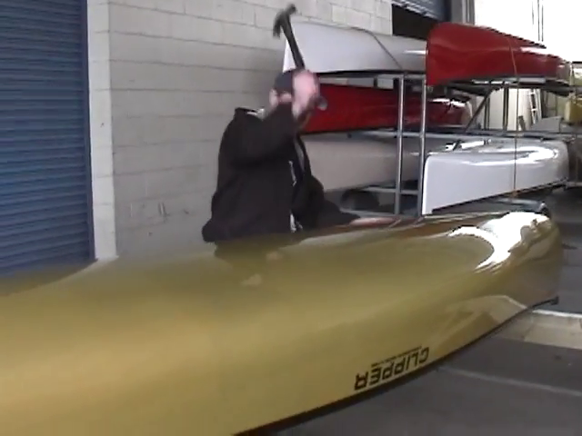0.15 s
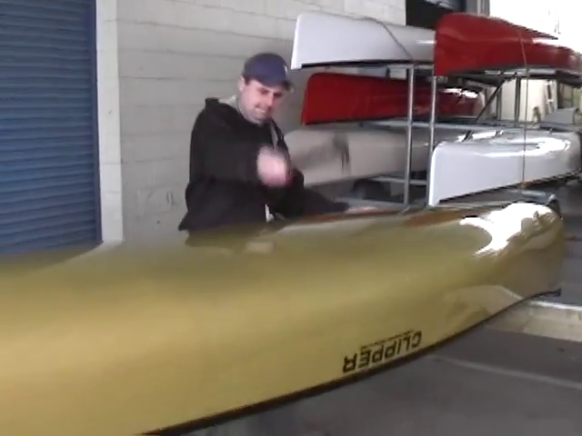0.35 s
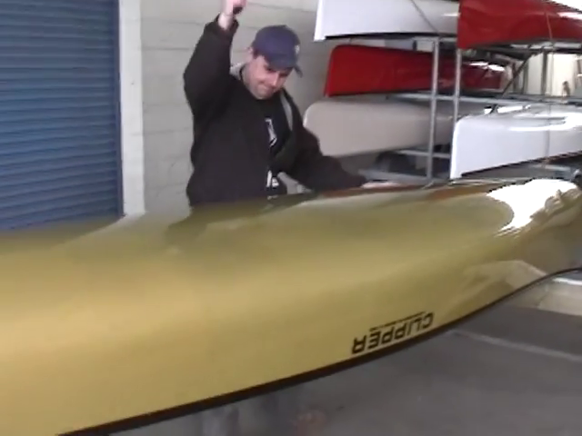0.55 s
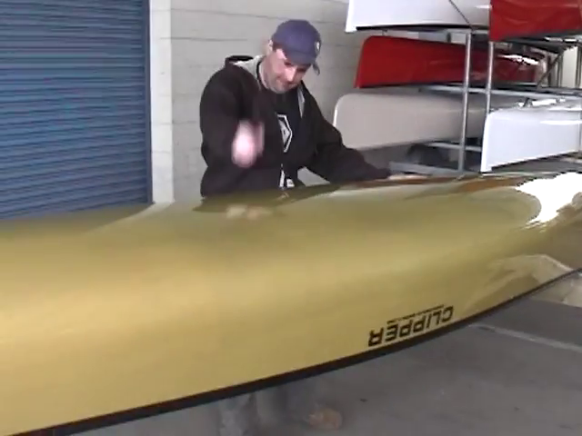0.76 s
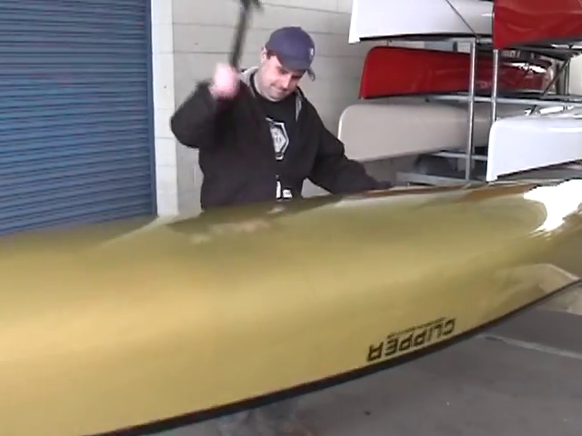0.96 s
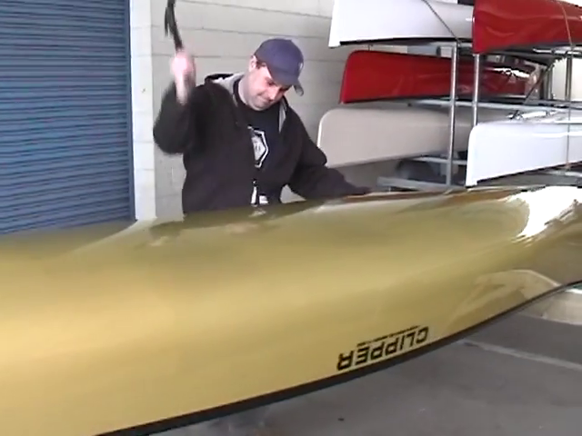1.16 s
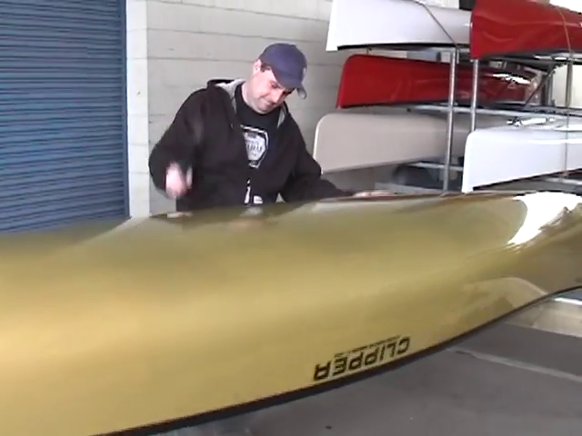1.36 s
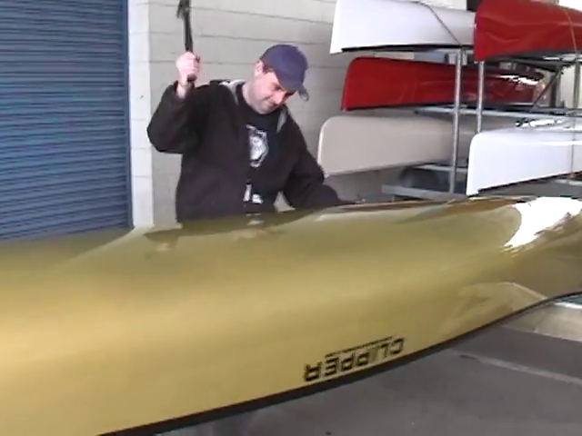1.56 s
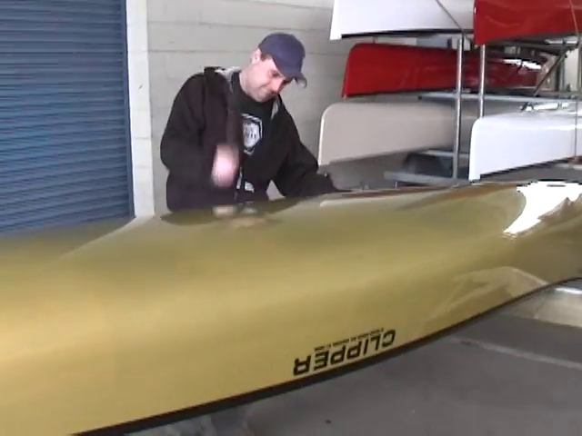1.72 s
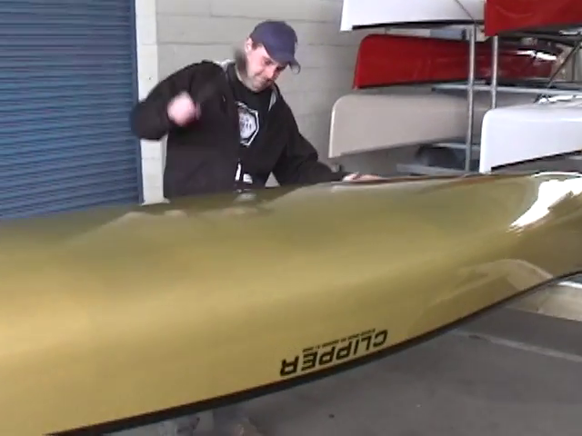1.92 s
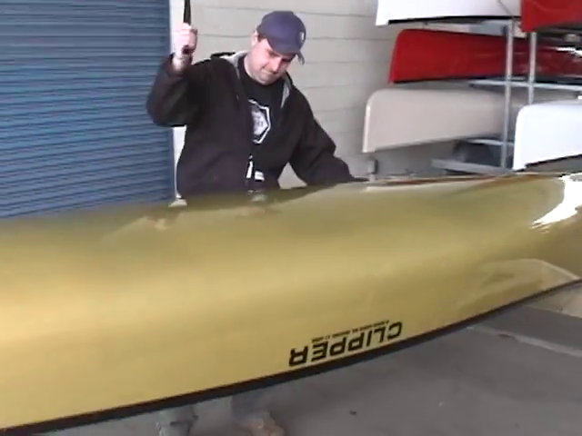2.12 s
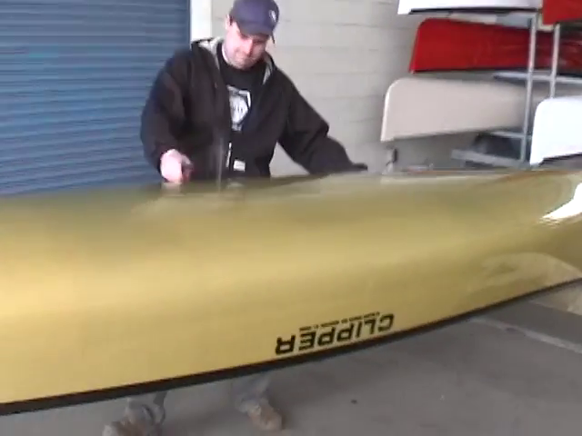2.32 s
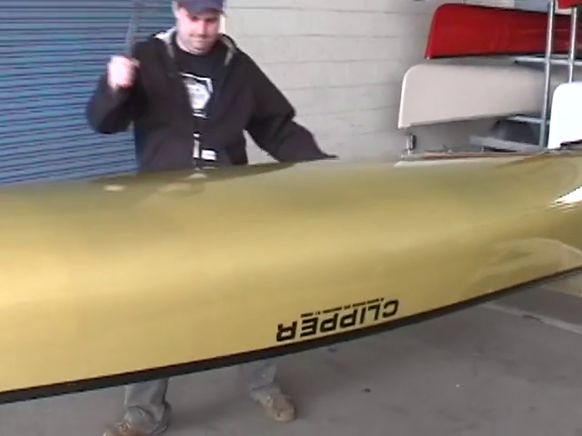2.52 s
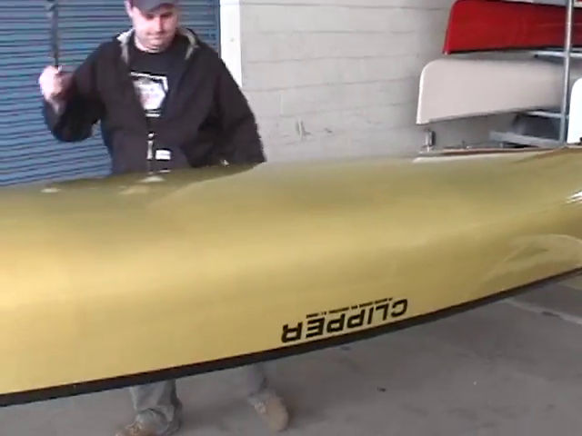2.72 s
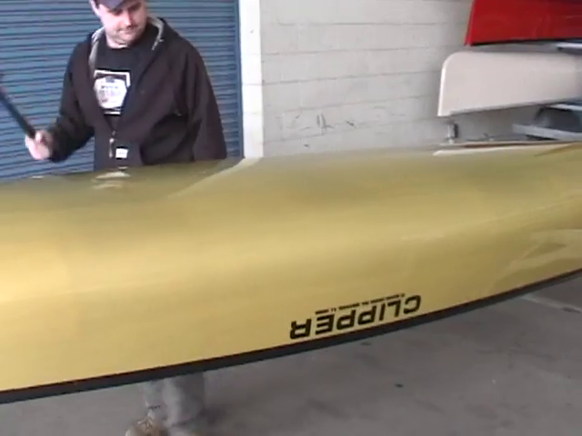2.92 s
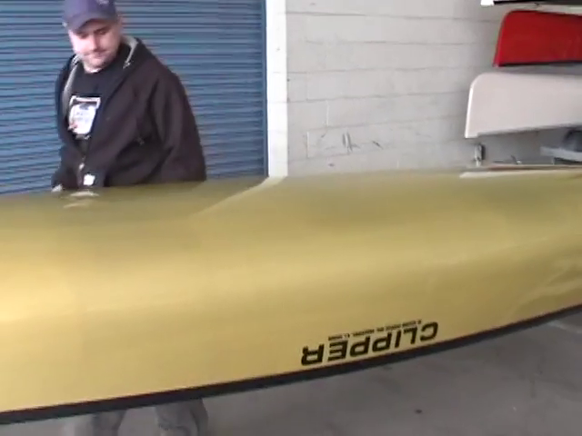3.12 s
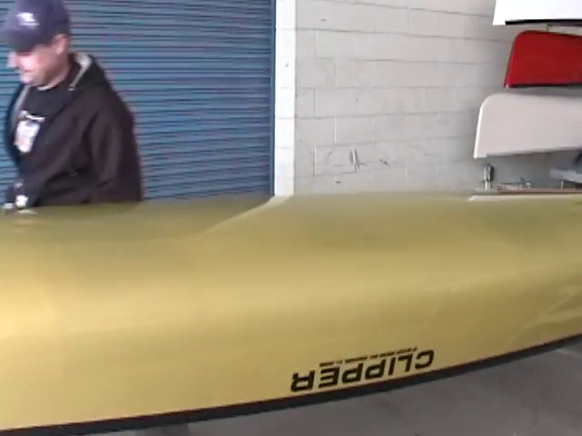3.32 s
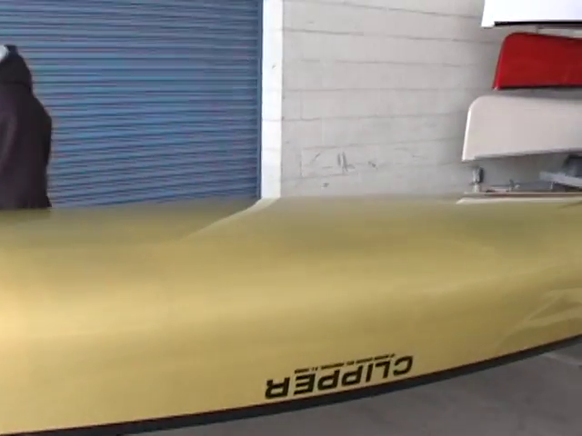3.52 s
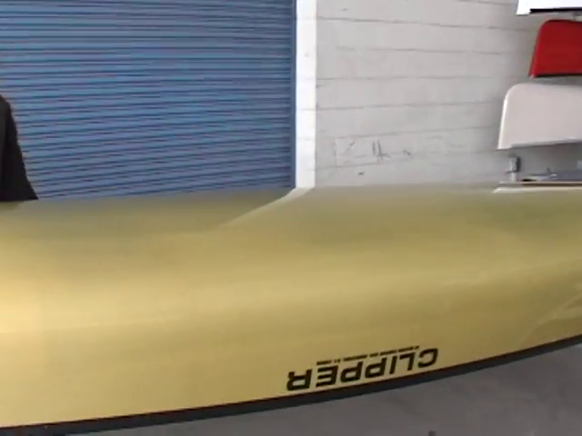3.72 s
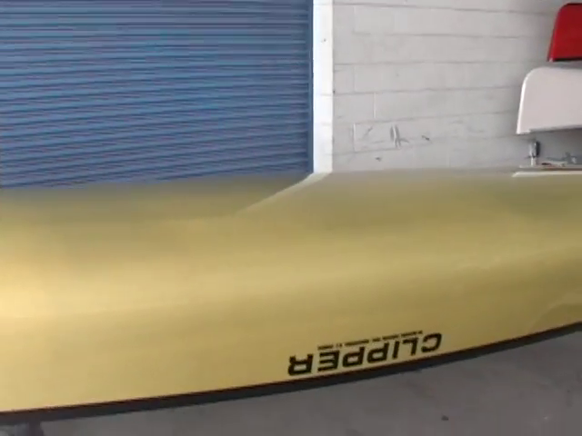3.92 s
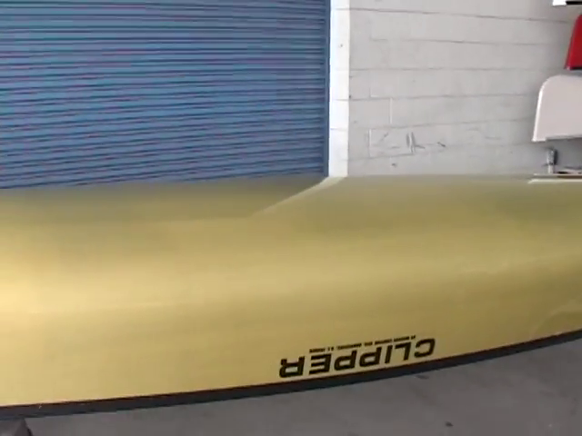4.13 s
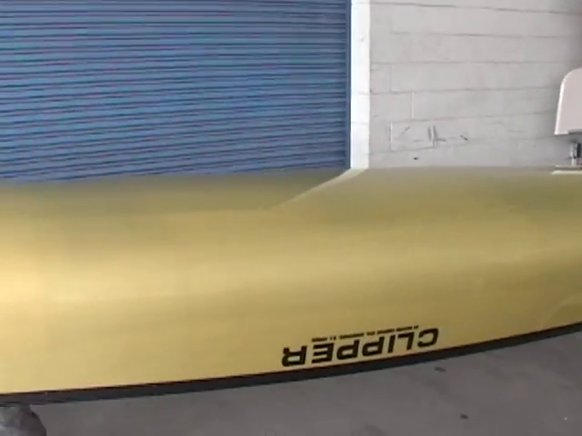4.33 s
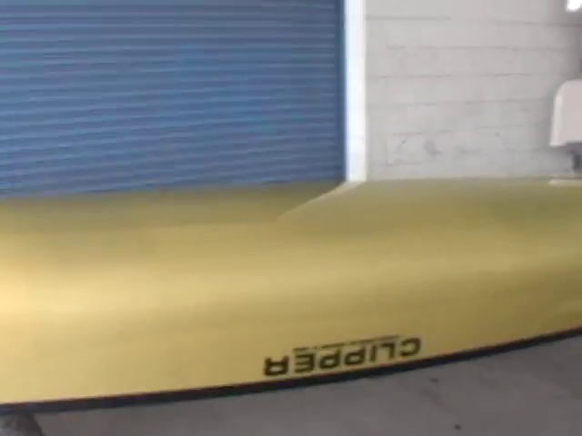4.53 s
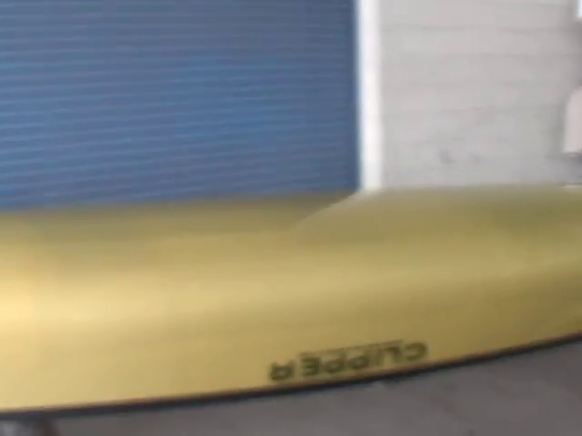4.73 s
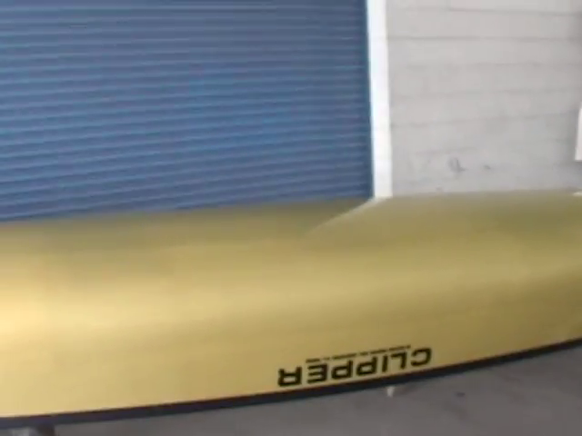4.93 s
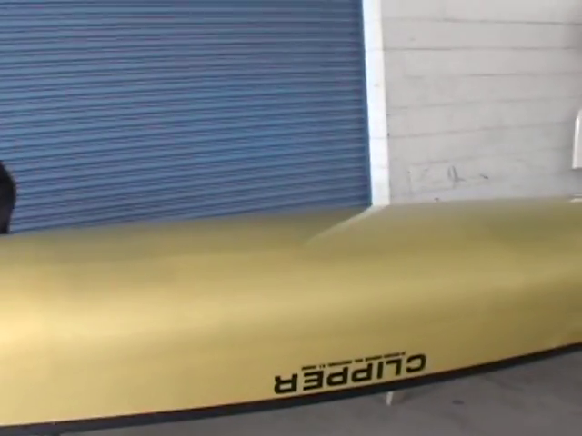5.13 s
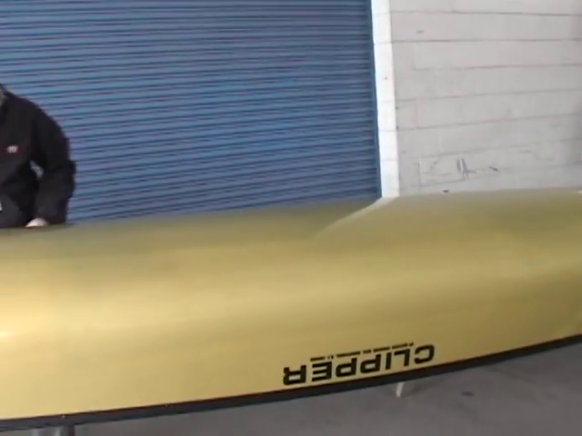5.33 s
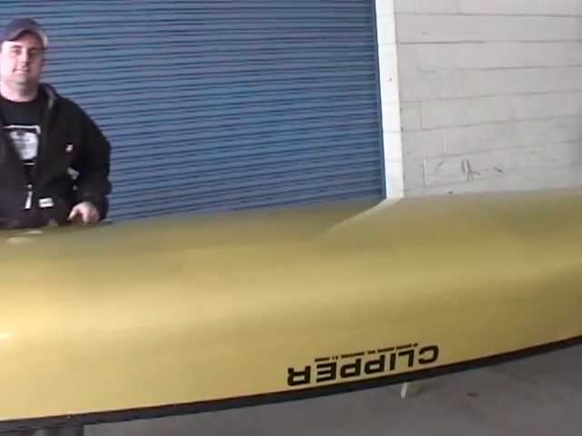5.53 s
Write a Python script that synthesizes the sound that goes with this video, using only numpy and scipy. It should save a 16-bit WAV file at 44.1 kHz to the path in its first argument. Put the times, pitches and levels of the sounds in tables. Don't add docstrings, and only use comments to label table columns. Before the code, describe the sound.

The stretch opens on the loud ringing tail of a hammer blow just struck. Five more blows follow at about 0.33, 0.84, 1.32, 1.81 and 2.35 s, steady and forceful: a hard steel crack with an instant slap off concrete, a hollow knock, then a dense low-mid boom from the hull and yard, overlapping into the next hit. The microphone clips on each, crunchy and compressed. Bright, grainy rattles of straps and racks shiver between blows. From 2.4 to about 4 s the boom decays, with faint late rattles. From about 3.6 s the recording gain creeps up, lifting a dull roar of traffic and machinery and an unsteady idling engine. Barely audible ticks come near 3.8 and 3.95 s; from 4.66 to 4.87 s there are dry clicks, a clearer clunk at 4.77 s and a brief scrape. A low, buzzy motor drone swells from about 4.7 s, strongest at 5.1 to 5.4 s, then eases slightly.

```python
import sys
import numpy as np
from scipy import signal
from scipy.fft import rfft, irfft, next_fast_len
from scipy.io import wavfile
from scipy.ndimage import uniform_filter1d

SR = 44100
rng = np.random.default_rng(int(sys.argv[2]) if len(sys.argv) > 2 else 0)


def to_linear_factor(level_db):
    exponent = np.asarray(level_db, float) / 20
    return 10 ** exponent


def to_wav(sig):
    pcm = np.clip(np.atleast_2d(sig), -1, 1) * 32767
    pcm = np.round(pcm).astype(np.int16)
    wavfile.write(sys.argv[1], SR, pcm.T)


N = 249593
T = np.arange(N) / SR


def on_log(table, hz):
    f, v = np.transpose(table)
    return np.interp(np.log(hz), np.log(np.maximum(f, 1)), v)


def walk(rate_hz):
    k = int(SR / rate_hz)
    held = np.repeat(rng.standard_normal(N // k + 1), k)
    return 1.296 * uniform_filter1d(uniform_filter1d(held, k), k)[:N]


def phase(hz):
    return 2 * np.pi * np.cumsum(hz) / SR


def fade(start_s, t60_s, rise_s):
    out = np.zeros(N)
    span = slice(max(int(start_s * SR) + 1, 0), int((start_s + 1.4 * t60_s) * SR))
    t = T[span] - start_s
    out[span] = (1 - np.exp(-t / rise_s)) * np.exp(-np.log(1000) * t / t60_s)
    return out


def bands(side, modal_db, modal_hz=22):
    n = next_fast_len(N)
    f = np.maximum(np.arange(n // 2 + 1) * SR / n, 1)
    mid, diff = rfft(rng.standard_normal((2, n)))
    k = int(modal_hz * n / SR)
    peaks = uniform_filter1d(rng.standard_normal(len(f)), k) * np.sqrt(k)
    ripple = to_linear_factor(modal_db * peaks * np.clip(f / 9000, 0, 1))
    mid = mid * ripple
    diff = diff * ripple * to_linear_factor(on_log(side, f))
    for hz in 22 * 2 ** (np.arange(20) / 2):
        share = np.clip(1 - 2 * np.abs(np.log2(f / hz)), 0, 1)
        yield hz, irfft(np.array([mid + diff, mid - diff]) * share, n)[:, :N]


def clatter(rows, rise_s, width, grain_db, spread, snap=0, top_hz=20000):
    out = np.zeros((2, N))
    grain = to_linear_factor(grain_db * walk(300))
    for s, db, hz, t60_s in rows:
        span = slice(int(s * SR), int((s + 1.5 * t60_s) * SR) + 200)
        env = (fade(s, t60_s, rise_s) * grain)[span]
        mid, diff = rng.standard_normal((2, len(env))) * env
        mid[1] += snap
        edges_hz = [hz / width, min(hz * width, top_hz)]
        sos = signal.butter(3, edges_hz, "bandpass", fs=SR, output="sos")
        out[:, span] += to_linear_factor(db) * signal.sosfilt(sos, [mid + spread * diff, mid - spread * diff])
    return out


# t/s, level/dB, treble share/dB, ring length factor, first crack f/Hz
BLOWS = [
    (-.165, -11.5, -1.5, 1.04, 9000),
    (.33, -12, .4, 1.01, 6500),
    (.8384, -11, .3, .94, 9000),
    (1.3203, -10.5, .3, .95, 5400),
    (1.8122, -10.5, -.6, 1.076, 7100),
    (2.349, -11, 0, .96, 6400),
]
# f/Hz, density/(dB per Hz)
BANG_SPECTRUM = [(30, -11), (55, -23.5), (85, -6.5), (200, 0), (400, -1), (700, -7.5), (1100, -9),
                 (2000, -14.5), (3900, -20), (6500, -15), (10500, -14.5), (13500, -13), (16000, -48)]
# f/Hz, t60/s
BANG_T60 = [(40, 0.54), (80, 2.24), (160, 1.23), (420, 1.586), (1100, 1.8), (2900, 1.294), (5500, 0.88),
            (11000, 0.61), (16000, 1.1)]
# f/Hz, rise/s
BANG_RISE = [(40, .004), (80, .015), (400, .004), (2000, .0025), (6000, .001)]
# f/Hz, side minus mid/dB
BANG_SIDE = [(30, -3.5), (60, -19), (110, -26), (200, -23.5), (380, -17), (700, -10.5), (1290, -6.5),
             (2380, -4.0), (4400, -3), (8120, -6), (15000, -13)]


def bang():
    out = 0
    for hz, noise in bands(BANG_SIDE, modal_db=3.2):
        bright = np.clip(np.log2(hz / 1500) / 2, 0, 1)
        t60_s, rise_s = on_log(BANG_T60, hz), on_log(BANG_RISE, hz)
        power = 0
        for s, db, treble_db, stretch, _ in BLOWS:
            ring = fade(s, t60_s * stretch ** bright, rise_s)
            power = power + (to_linear_factor(db + bright * treble_db) * ring) ** 2
        level_db = on_log(BANG_SPECTRUM, hz) + 13.5 + 1.1 * walk(20)
        out = out + to_linear_factor(level_db) * np.sqrt(power) * noise
    return out


# f/Hz, level/dB, t60/s
HULL_MODES = [(83.3, -25, 1.4), (114.8, -15.5, 1.3), (182.2, -10, 1.5), (228, -18.5, 0.99),
              (275.8, -12, 1.1), (352, -10, 1.1), (382.3, -9.5, 1.53), (511, -17.5, 1.4), (663, -14, 0.59),
              (800.5, -13, 1.05), (972, -12, 0.6), (1151, -12.5, 0.97)]


def hull():
    out = 0
    for hz, db, t60_s in HULL_MODES:
        size = sum(to_linear_factor(blow[1]) * fade(blow[0], t60_s, rise_s=.0048) for blow in BLOWS)
        out = out + to_linear_factor(db - 4) * size * np.sin(phase(hz * (1 + .022 * walk(25))))
    return out


def cracks():
    bounce_s, bounce_db = .0036, -2.5
    hits, knocks = [], []
    for s, db, _, _, hz in BLOWS[1:]:
        hits.append((s, db + 16, hz, .008))
        hits.append((s + bounce_s, db + 16 + bounce_db, hz, .008))
        knocks.append((s, db + 1.5, 1100, .09))
    steel = clatter(hits, rise_s=.0002, width=1.25, grain_db=.6, spread=.12)
    return steel + clatter(knocks, rise_s=.0006, width=2.34, grain_db=3, spread=.3)


# t/s, peak/dB
RATTLES = [(.166, -30), (.575, -22.5), (.77, -40), (1.03, -20.5), (1.52, -34), (1.565, -21), (1.974, -17),
           (2.075, -21.5), (2.19, -31.5), (2.3, -42), (2.63, -44), (2.76, -46), (2.82, -51)]
SETTLE_S = [0.26, .44]
SETTLE_DB = [-23, -36.5]


def rattles():
    hits = list(RATTLES)
    for s, db, *_ in BLOWS:
        hits += [(s + lag_s, db + loss_db) for lag_s, loss_db in zip(SETTLE_S, SETTLE_DB)]
    rows = [(s, db, 10000, .13) for s, db in hits]
    return clatter(rows, rise_s=.0071, width=1.24, grain_db=3, spread=.35)


# t/s, peak/dB, f/Hz
TICKS = [(3.762, -58.5, 4000), (3.954, -54.5, 4000), (4.661, -43, 6500), (4.679, -52, 8060),
         (4.697, -47, 6500), (4.728, -55, 7000), (4.765, -26, 2300), (4.765, -43, 7460), (4.815, -40, 3380),
         (4.846, -53, 7000), (4.863, -40, 3400), (4.87, -44, 3400)]


def ticks():
    rows = [(s, db, hz, .0012 + .0004 * hz / 1000) for s, db, hz in TICKS]
    return clatter(rows, rise_s=.0001, width=1.47, grain_db=.6, spread=.3, snap=4.1, top_hz=10500)


# t/s, peak/dB
SCRAPES = [(4.665, -56), (4.77, -53), (4.84, -61)]


def scrapes():
    rows = [(s, db, 5500, .21) for s, db in SCRAPES]
    return clatter(rows, rise_s=.002, width=1.83, grain_db=4, spread=.33)


IDLE_ORDERS = [2.25, 2.85, 3.5, 4.75, 7, 8, 9, 10, 11, 14, 15, 16, 16.9, 19, 21]
IDLE_DB = [-62, -57, -52.5, -53, -64, -62, -59, -58, -58.5, -60.5, -57.5, -55, -55.5, -62, -64]


def idling_engine():
    crank = phase(25.36 * (1 + .0015 * walk(1.48)))
    out = 0
    for order, db in zip(IDLE_ORDERS, IDLE_DB):
        out = out + to_linear_factor(db + 2.1 * walk(4)) * np.sin(order * crank + 6 * rng.random())
    return out


# multiple of shaft rate, level/dB
DRONE = [(1, -2), (3, -4), (5, -6)]


def drone():
    shaft = phase(85 * (1 + .0036 * walk(2.5)))
    tone = sum(to_linear_factor(db + 1.2 * walk(7.3)) * np.sin(k * shaft) for k, db in DRONE)
    sos = signal.butter(2, [2200, 6500], "bandpass", fs=SR, output="sos")
    hiss = signal.sosfilt(sos, rng.standard_normal((2, N)))
    far_db, near_db = -62, -45.5
    near_s, comes_s, stays_s, goes_s = 5.11, .42, .28, .43
    when_s = [near_s - comes_s, near_s, near_s + stays_s, near_s + stays_s + goes_s]
    level_db = np.interp(T, when_s, [far_db, near_db, near_db, far_db])
    return (tone + to_linear_factor(-18) * hiss) * to_linear_factor(level_db)


# f/Hz, density/(dB per Hz)
YARD_SPECTRUM = [(30, -29.5), (60, -10.5), (100, -7), (170, -7.5), (250, -12), (500, -10.5), (1100, -8.5),
                 (2000, -19.5), (3000, -27.5), (4500, -36.5), (8000, -45.5), (12000, -53), (16000, -64)]
# f/Hz, side minus mid/dB
YARD_SIDE = [(60, -21.5), (110, -14.5), (200, -19), (380, -8.5), (700, -10.5), (1290, -5.5), (2380, -2),
             (4400, -1), (8120, -8), (15000, -7)]


def yard():
    swell_db = .38 * walk(.86)
    out = 0
    for hz, noise in bands(YARD_SIDE, modal_db=2.4):
        level_db = on_log(YARD_SPECTRUM, hz) - 24 + swell_db + .74 * walk(9.3)
        out = out + to_linear_factor(level_db) * noise
    return out


def line_whistle():
    return to_linear_factor(-92.5) * np.sin(2 * np.pi * 15734.3 * T)


def scene():
    blows = bang() + hull() + cracks() + rattles()
    put_aside = ticks() + scrapes()
    return blows + put_aside + idling_engine() + drone() + yard() + line_whistle()


def recover_gain(x):
    start_s, db_per_s, max_db, knee = 3.55, 11, 14.5, 3.13
    climb = np.maximum(T - start_s, 0) * db_per_s / max_db
    return x * to_linear_factor(max_db * climb / (1 + climb ** knee) ** (1 / knee))


def overload(x):
    ceiling, knee = .3, 11
    rail = np.where(x > 0, 1.18, 1)
    x = x / ceiling * rail
    return ceiling * x / (1 + np.abs(x) ** knee) ** (1 / knee) / rail


def transport_whine():
    return to_linear_factor(-80 + 1.2 * walk(40)) * np.sin(phase(8550 * (1 + .006 * walk(90))))


def notch_drum(x):
    drum_hz, depth, narrow = 150 / 1.001, .99, .55
    n = next_fast_len(N + SR)
    turn = np.exp(-2j * np.pi * np.arange(n // 2 + 1) * SR / n / drum_hz)
    comb = (1 - depth * turn) / (1 - narrow * turn)
    return irfft(rfft(x, n) * comb, n)[:, :N]


def top_cut(x):
    return signal.sosfilt(signal.butter(12, 16650, fs=SR, output="sos"), x)


def record(dry):
    x = overload(recover_gain(dry)) + transport_whine()
    x = signal.sosfilt(signal.ellip(10, .3, 60, 15850, fs=SR, output="sos"), x)
    return top_cut(notch_drum(x))


dry = scene()
out = record(dry)
to_wav(out)
```